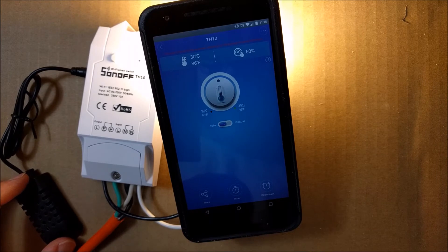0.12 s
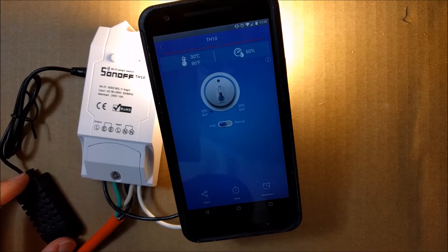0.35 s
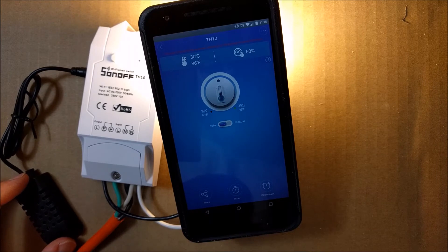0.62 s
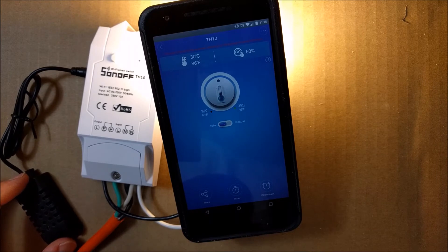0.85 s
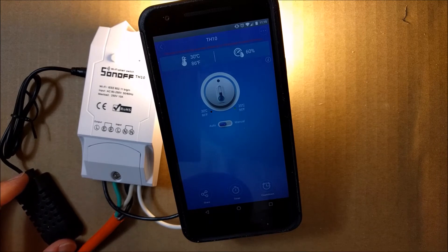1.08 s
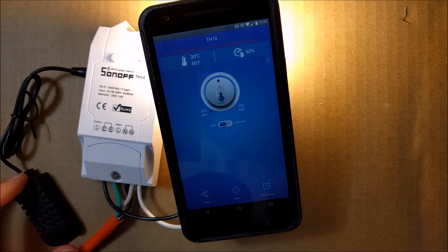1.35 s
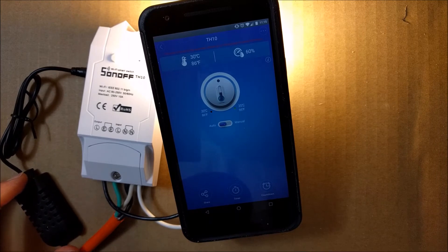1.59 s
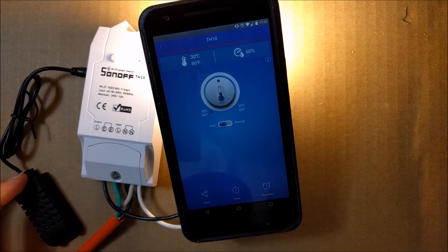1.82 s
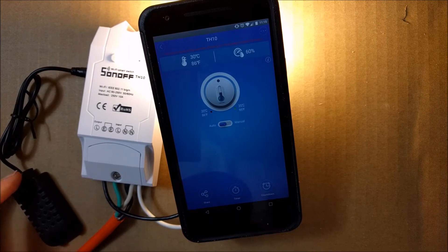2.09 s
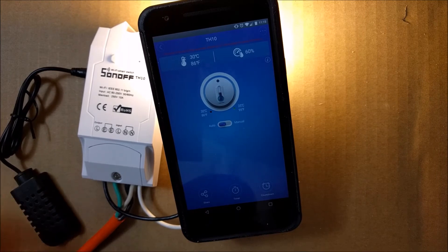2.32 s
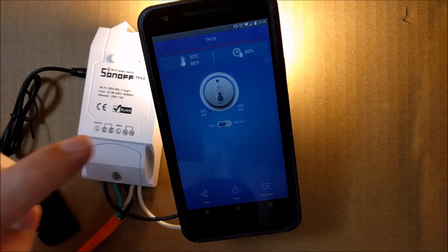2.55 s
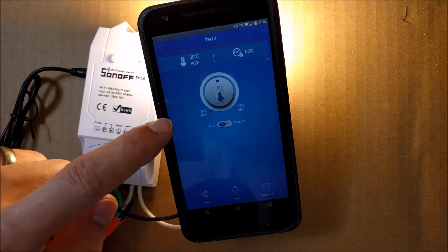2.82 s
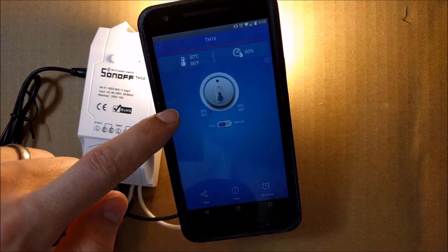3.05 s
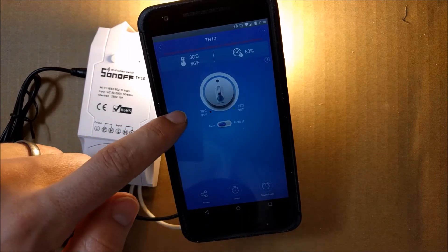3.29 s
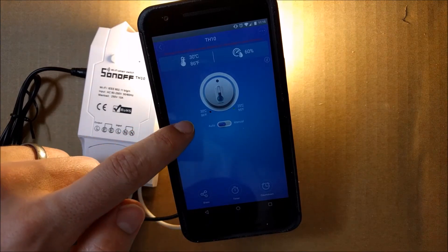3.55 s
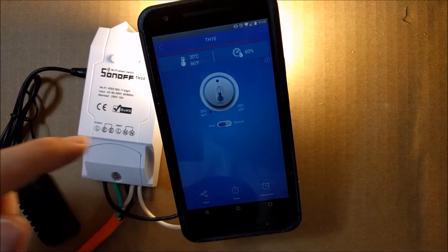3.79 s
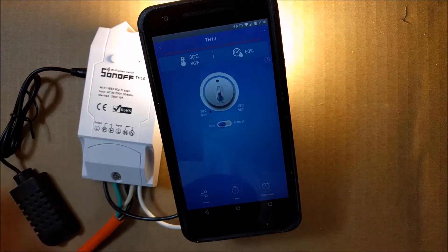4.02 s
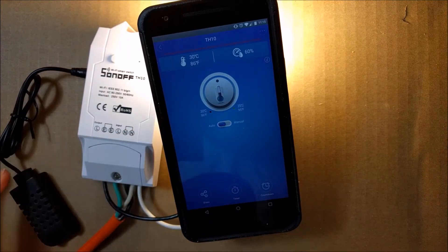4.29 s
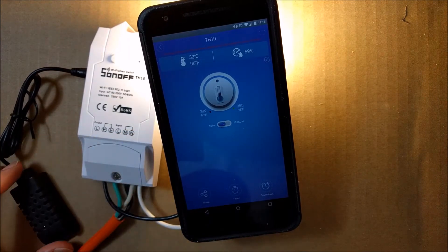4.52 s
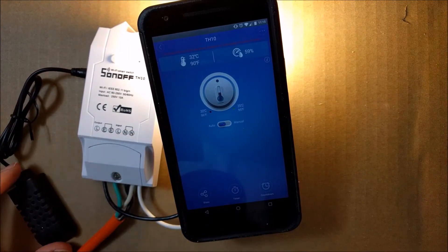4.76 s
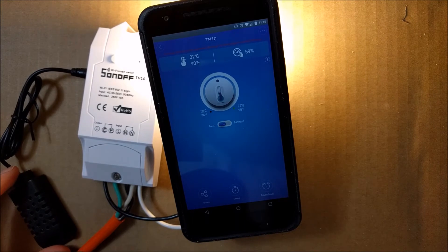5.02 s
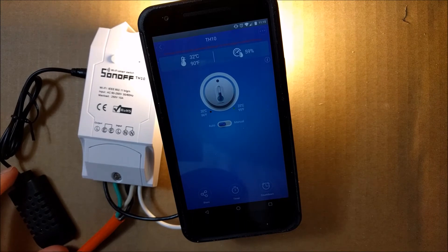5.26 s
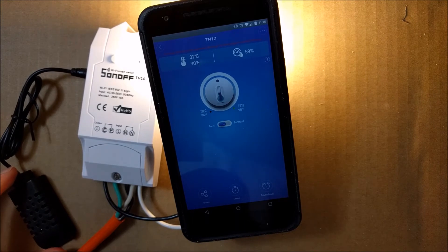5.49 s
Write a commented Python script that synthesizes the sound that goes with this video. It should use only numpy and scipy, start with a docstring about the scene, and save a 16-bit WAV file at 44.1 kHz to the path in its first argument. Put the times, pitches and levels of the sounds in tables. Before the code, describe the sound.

A handheld hair dryer, mostly out of view, blows on high throughout, close to a small microphone over a table with a phone and sensor. Broad roaring air, a hollow mid-range resonance and bright hiss carry a thin, very high motor whine. The whine is strong at first, weakens around the middle as the dryer turns away, then returns. Brief compressed-sounding glitches thin the noise. No speech, taps or clicks.

```python
"""A hand-held hair dryer roars and whines on high near a small microphone, settling up to full speed.
Turbulent air is noise shaped by housing, pipe and nozzle resonances; the whine is a bank of sines
at multiples of the shaft speed. The hand's slight sway shifts the balance of tones and noise.
Now and then the sound thins to a few brief tones."""
import sys
import numpy as np
from scipy import signal
from scipy.fft import rfft, irfft, next_fast_len
from scipy.io import wavfile
from scipy.ndimage import uniform_filter1d, map_coordinates

SR = 44100
rng = np.random.default_rng(int(sys.argv[2]) if len(sys.argv) > 2 else 0)


def file_out(sig):
    """Save sig as 16-bit WAV at sys.argv[1]."""
    # one column per channel
    cols = np.atleast_2d(sig).T
    # limit, then scale
    lim = np.clip(cols, -1, 1)
    pcm = np.round(lim * 32767).astype(np.int16)
    wavfile.write(sys.argv[1], SR, pcm)


def gain_from_decibels(decibels):
    """Convert decibel values to linear amplitude factors."""
    exponent = np.asarray(decibels, float) / 20
    return 10 ** exponent


N = 248178

# Resonances of housing and table in the roar: f/Hz, width/Hz, relative level/dB
HOUSING = [(59.8, 8.4, -9.5), (118, 27, -12.5), (216.7, 30, -14.5), (314.8, 67, -8), (352, 35, -4.5),
           (445, 130, -9), (630, 81, -10.5), (866.5, 81, -11), (1024.3, 130, -7), (1738, 250, -17),
           (2212, 370, -18.5), (2563, 130, -22), (2777, 120, -24), (3080, 360, -21), (3688, 500, -17),
           (4398, 120, -19), (4722, 180, -18.5), (5174, 650, -18.5), (5803, 240, -13)]
# Pipe resonance of the barrel, which half sings: f/Hz, width/Hz, relative level/dB
PIPE = [(1304, 30, -2), (1292, 110, -5.5), (1400, 75, -10), (1510, 42, -19)]
# Resonances of nozzle and microphone port in the hiss: f/Hz, width/Hz, relative level/dB
NOZZLE = [(6270, 120, -35), (6750, 500, -9.5), (7117, 540, -6.5), (7780, 570, -14), (8500, 250, -18)]
# Broad turbulence under the resonances: f/Hz, relative level/dB
TURBULENCE = [(25, -50), (48, -19), (250, -24), (2000, -25), (6000, -29), (9000, -27), (12000, -27.5),
              (15500, -29.5)]
# Whine before waver and sway: shaft multiple, level/dB
SHAFT_TONES = [(5, -55.0), (8, -58.0), (15, -55.0), (20, -57.0), (21, -62.0), (25, -53.0), (26, -56.0),
               (27, -59.0), (28, -59.0), (29, -46.0), (30, -50.0), (31, -52.0), (32, -49.0), (33, -44.0),
               (34, -35.0), (35, -41.0), (36, -47.0), (38, -56.0), (39, -46.0), (40, -66.0), (41, -66.0),
               (44, -65.0), (45, -67.0), (46, -64.0), (47, -67.0), (48, -67.0), (49, -63.0), (50, -67.0),
               (51, -66.0), (54, -55.0), (55, -65.0), (56, -63.0), (57, -64.0), (59, -63.0), (60, -64.0),
               (61, -62.0), (63, -68.0), (64, -68.0), (68, -68.0), (69, -65.0)]
# Tones that swell or shrink as the nozzle faces the microphone:
# shaft multiple: (slope/(dB per dB of facing), offset/dB, chance waver/dB)
FACING_TONES = {35: (0.86, 0, 0), 39: (0.92, 0, 0), 29: (-1.4, -5, 2.3), 33: (0.7, 0, 2.1),
                36: (0.72, -3, 2.5), 49: (-1.2, -2, 1)}
# Sway of the dryer in the hand: t/s, nozzle facing/dB, loudest-tone gain/dB, fading-tone gain/dB,
# pipe gain/dB, hiss gain/dB
SWAY = [(0.0, 1, -3, 8, -1.2, -0.5), (0.3, 0, 2, 6, 0.7, -0.1), (0.7, 2.5, 2.5, 5, .4, -0.3),
        (1.2, 1, 5.5, 4, -1, 0), (1.8, 0.5, 3.5, 2.5, -1.1, 1), (2.1, 0.5, 2.5, 0.5, 0, .5),
        (2.4, 0, -5, 0, 1.3, 0.7), (2.7, -6.5, -5.5, -2, 2, -1.34), (3.2, -4, -5, -1, 2.5, -.9),
        (3.6, -6, -10, -2, 0.2, -1), (3.9, -3.5, -3, -1, 1.5, -1.4), (4.2, -4, -3, -7, -3, 1.9),
        (4.5, 1, 3.5, -22, 2, 1), (4.8, 0.5, 0.5, -13, 0, .8), (5.1, 0.5, 0.5, -11, -1, 1.1),
        (5.63, 3, -1, -16, -1.6, 1.1)]
# Longer thin instants: t/s, length/blocks
THIN_RUNS = [(0.393, 2), (0.457, 2), (1.929, 2), (2.035, 2), (2.121, 2), (2.398, 2), (3.123, 2), (4.083, 2),
             (4.382, 3), (4.531, 2)]
# Coarse amplitude step of the tones left in a thin instant: f/Hz, level/dB
THIN_STEP = [(100, -17), (300, -13), (1300, -11), (2500, -15), (5500, -15), (6800, -11), (7800, -11),
             (8500, -17), (15000, -19)]

LOUDEST_MULTIPLES, FADING_MULTIPLES = (34,), (15, 54, 56)
FULL_HZ, SHORT_HZ, SETTLE_S, CREEP_HZ_PER_S = 219.62, .6, .6, .028
MAINS_HZ, TOP_HZ = 60, 15740
THIN_HOP_SAMPLES, THIN_START_SAMPLES = 941, 358
LONE_DRAWS_PER_S = 5.5  # before neighbours are dropped


def unit(x):
    """Scaled to rms 1."""
    return x / np.sqrt(np.mean(x ** 2) + 1e-20)


def curves(rows):
    """One value per sample for each column after the time."""
    t_s, *columns = np.transpose(rows)
    return [np.interp(np.arange(N) / SR, t_s, column) for column in columns]


def wobble(knots_per_s):
    """Smooth random curve through normal knots."""
    knots = rng.standard_normal(int(N * knots_per_s / SR) + 4)
    return map_coordinates(knots, [np.arange(N) * knots_per_s / SR])


def filtered(x, response):
    """x through a zero-phase gain given as a function of f/Hz."""
    size = next_fast_len(N + 8192)
    return irfft(rfft(x, size) * response(np.fft.rfftfreq(size, 1 / SR)), size)[:N]


def peaks(table, steep):
    """Gain of resonances whose powers add; steep sets how fast the skirts fall."""
    def gain(f_hz):
        return np.sqrt(sum(gain_from_decibels(2 * db) / (1 + (2 * (f_hz - hz) / width_hz) ** 2) ** steep
                           for hz, width_hz, db in table))
    return gain


def rush(response, patchy_db):
    """Coloured noise with drifting patches of gain, as turbulence gives."""
    z = signal.stft(rng.standard_normal(N + 512), nperseg=512)[2]
    field = uniform_filter1d(rng.standard_normal(z.shape), size=5, axis=0)  # over frequency
    field = uniform_filter1d(field, size=16, axis=1)  # over time
    patchy = signal.istft(z * gain_from_decibels(patchy_db * unit(field)), nperseg=512)[1][:N]
    return filtered(unit(patchy), response)


def housing_roar(hiss_db):
    """Turbulence rings the housing, heard more as the nozzle turns away and its hiss drops."""
    return gain_from_decibels(-.45 * hiss_db) * rush(peaks(HOUSING, steep=1.5), patchy_db=0.23)


def pipe_song(pipe_db):
    """Flow partly locks onto the pipe: a tone of unsteady pitch inside resonant noise."""
    pitch_hz = PIPE[0][0] + 17 * wobble(30)
    tone = gain_from_decibels(-30 + 2.7 * wobble(12)) * np.sin(2 * np.pi * np.cumsum(pitch_hz) / SR)
    noise = rush(peaks(PIPE, steep=1.7), patchy_db=0.55)
    return gain_from_decibels(pipe_db) * (noise + tone)


def nozzle_hiss(turn, hiss_db):
    """Nozzle turbulence pulses a little once and twice per rotor turn."""
    pulse = 1 + 0.03 * np.cos(turn) + 0.044 * np.cos(2 * turn)
    return gain_from_decibels(hiss_db) * pulse * rush(peaks(NOZZLE, steep=1.4), patchy_db=0.93)


def broad_rush(gain_db):
    """Broadband turbulence, its level interpolated over log frequency."""
    hz, db = np.transpose(TURBULENCE)
    return gain_from_decibels(gain_db) * rush(lambda f: gain_from_decibels(np.interp(np.log(f + 1), np.log(hz), db)), patchy_db=0.6)


def airflow(turn, facing_db, pipe_db, hiss_db):
    """Fan turbulence: roar, pipe, hiss and broad rush, the last following the facing."""
    roar = housing_roar(hiss_db)
    pipe = pipe_song(pipe_db)
    hiss = nozzle_hiss(turn, hiss_db)
    broad = broad_rush(0.22 * facing_db + 0.14)
    return gain_from_decibels(-10.5) * (roar + pipe + hiss + broad)


def whine(turn, facing_db, loudest_db, fading_db):
    """Commutator and blades sound at shaft multiples; supply ripple adds side lines MAINS_HZ away."""
    sway_db = {}
    for k, (slope, offset_db, waver_db) in FACING_TONES.items():
        sway_db[k] = slope * facing_db + offset_db + waver_db * wobble(2.5)
    sway_db.update({k: loudest_db for k in LOUDEST_MULTIPLES})
    sway_db.update({k: fading_db for k in FADING_MULTIPLES})
    mains = 2 * np.pi * MAINS_HZ * np.arange(N) / SR
    ripple = 1 + .12 * np.cos(mains)
    # torque ripple and load jitter shake the rotor angle
    turn = turn + .015 * np.cos(mains) + .002 * wobble(25)
    tones = np.zeros(N)
    starts_rad = rng.uniform(0, 2 * np.pi, len(SHAFT_TONES))
    for (k, db), start_rad in zip(SHAFT_TONES, starts_rad):
        if k in sway_db:
            gain_db = sway_db[k] + 1.5 * wobble(8)
        else:
            gain_db = 2.8 * wobble(1.2) - 1
        tones += gain_from_decibels(db + gain_db) * np.sin(k * turn + start_rad)
    return np.sqrt(2) * ripple * tones  # sqrt(2): rms to peak


def thin_blocks():
    """Numbers of the thin blocks: listed runs, and lone ones by chance that touch no other."""
    runs = np.zeros((N - THIN_START_SAMPLES) // THIN_HOP_SAMPLES, bool)
    for t_s, blocks in THIN_RUNS:
        first = round((t_s * SR - THIN_START_SAMPLES) / THIN_HOP_SAMPLES)
        runs[first:first + blocks] = True
    lone = rng.random(len(runs)) < LONE_DRAWS_PER_S * THIN_HOP_SAMPLES / SR
    lone &= ~np.roll(runs | lone, 1) & ~np.roll(runs, -1)
    return np.flatnonzero((runs | lone)[1:]) + 1


def thinned(x):
    """In thin blocks of about 40 ms only partials that stand out survive, in coarse amplitude steps."""
    hop = THIN_HOP_SAMPLES
    n, k = np.arange(2 * hop) + .5, np.arange(hop) + .5
    # overlapping sine-windowed cosines
    basis = np.cos(np.pi / hop * np.outer(n + hop / 2, k)) * np.sqrt(2 / hop)
    basis *= np.sin(np.pi * n / (2 * hop))[:, None]
    starts = THIN_START_SAMPLES + (thin_blocks() - 1) * hop
    at = starts[:, None] + np.arange(2 * hop)
    parts = x[at] @ basis
    f_hz = k * SR / (2 * hop)
    hz, db = np.transpose(THIN_STEP)
    step = gain_from_decibels(np.interp(f_hz, hz, db))
    # rms over all thin blocks and neighbouring partials
    local = np.sqrt(np.abs(uniform_filter1d(np.mean(parts ** 2, axis=0), size=30)))
    faintest = gain_from_decibels(np.where(f_hz < 9000, -32, -27.3))
    threshold = np.clip(2.2 * local, faintest, .6 * step)
    size = np.abs(parts)
    steps = np.maximum(1, np.round(size / step))
    kept = np.sign(parts) * (size > threshold) * step * steps
    change = (kept - parts) @ basis.T
    return x + np.bincount(at.ravel(), change.ravel(), N)


def scene():
    """Air and whine as the shaft settles to speed, then creeps on as the motor warms."""
    t = np.arange(N) / SR
    shaft_hz = FULL_HZ - SHORT_HZ * np.exp(-t / SETTLE_S) + CREEP_HZ_PER_S * t
    turn = 2 * np.pi * np.cumsum(shaft_hz) / SR
    facing_db, loudest_db, fading_db, pipe_db, hiss_db = curves(SWAY)
    air = airflow(turn, facing_db, pipe_db, hiss_db)
    return (air + whine(turn, facing_db, loudest_db, fading_db))[None]


def band_limit(x):
    """A steep low-pass at the top of the band."""
    return signal.sosfilt(signal.butter(12, 17000, fs=SR, output="sos"), x)


def record(dry):
    """Bass cut at 44 Hz and band limit at TOP_HZ, then brief thinning."""
    banded = filtered(dry[0], lambda hz: (hz < TOP_HZ) / (1 + (44 / (hz + 1)) ** 4))
    mix = thinned(banded)[None]
    return band_limit(mix)


dry = scene()
out = record(dry)
file_out(out)
```